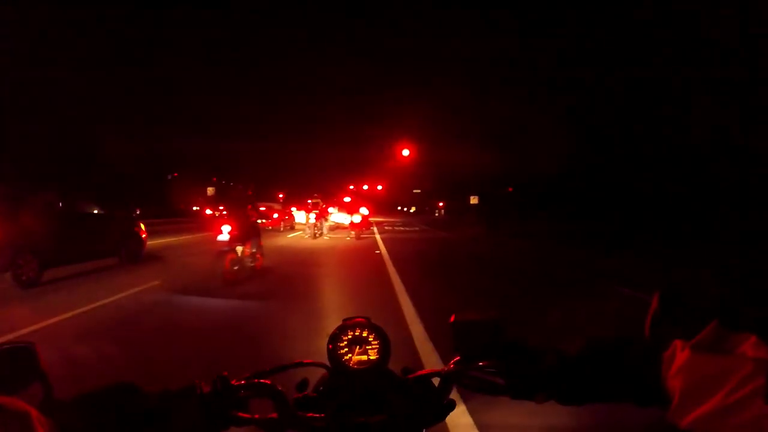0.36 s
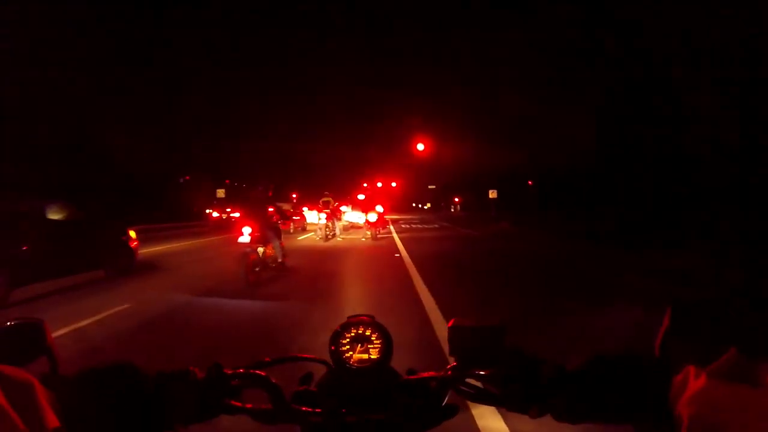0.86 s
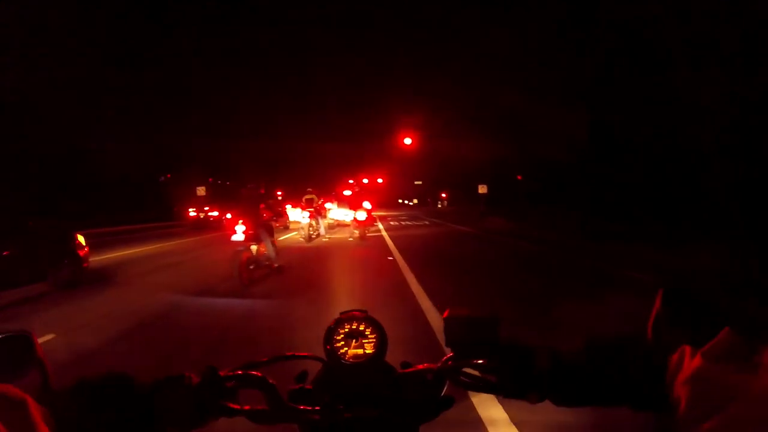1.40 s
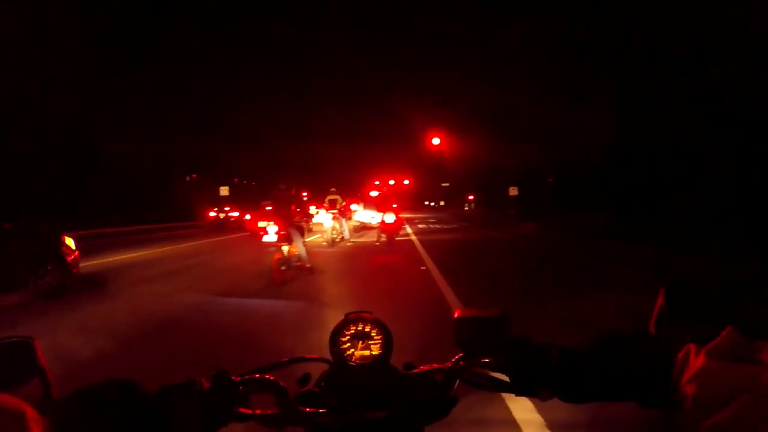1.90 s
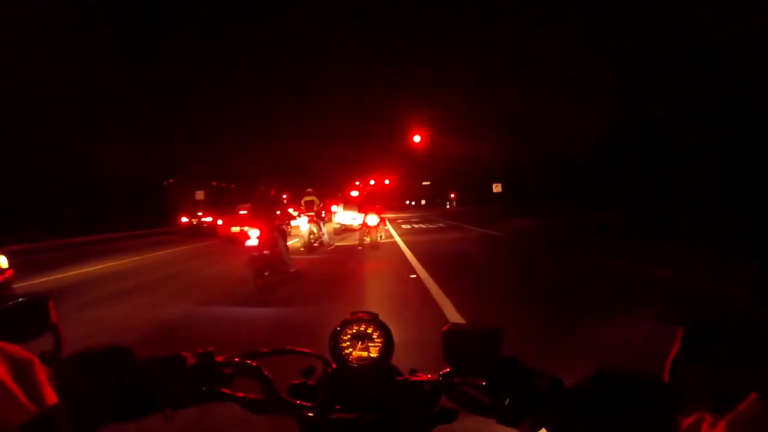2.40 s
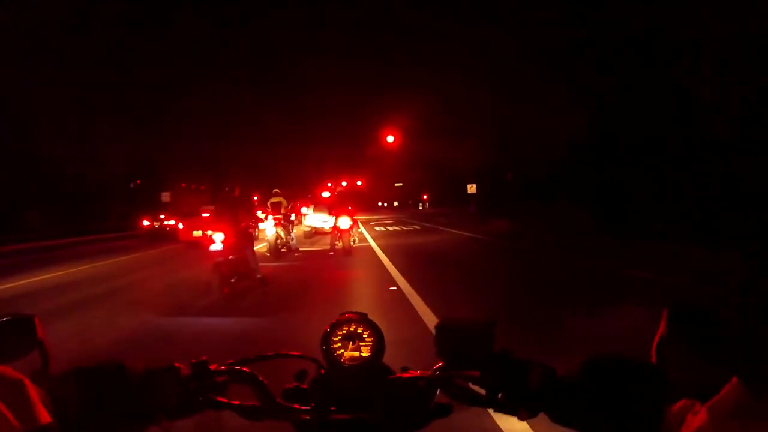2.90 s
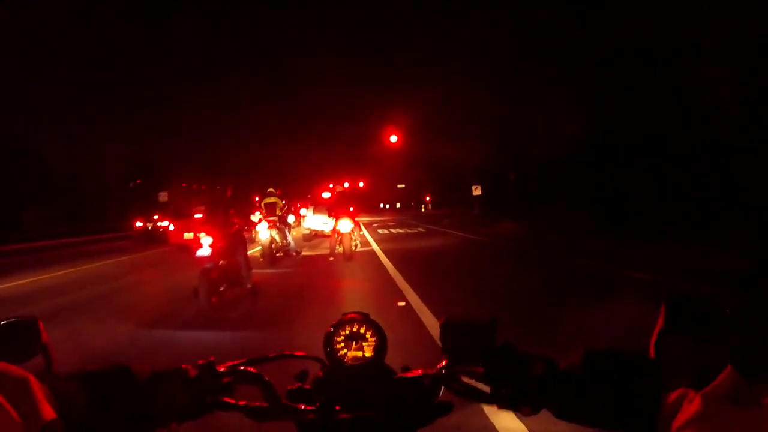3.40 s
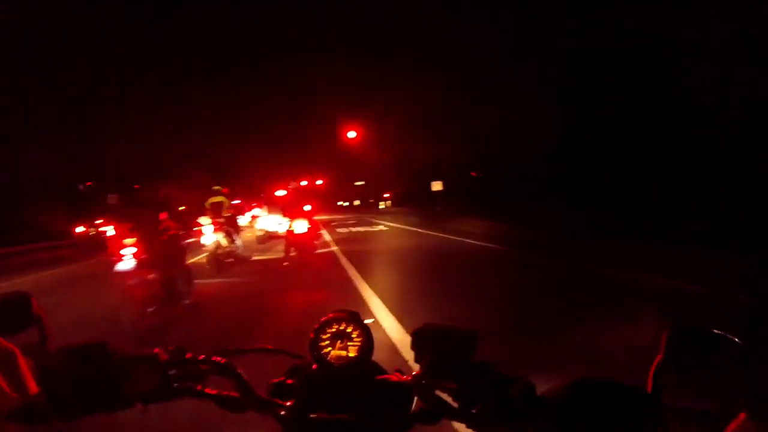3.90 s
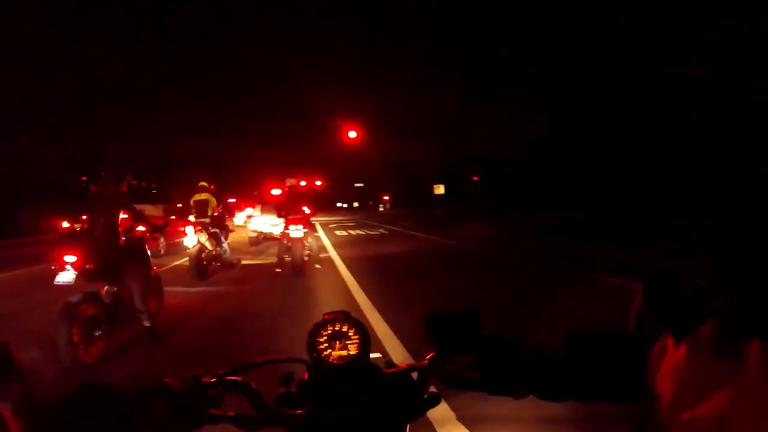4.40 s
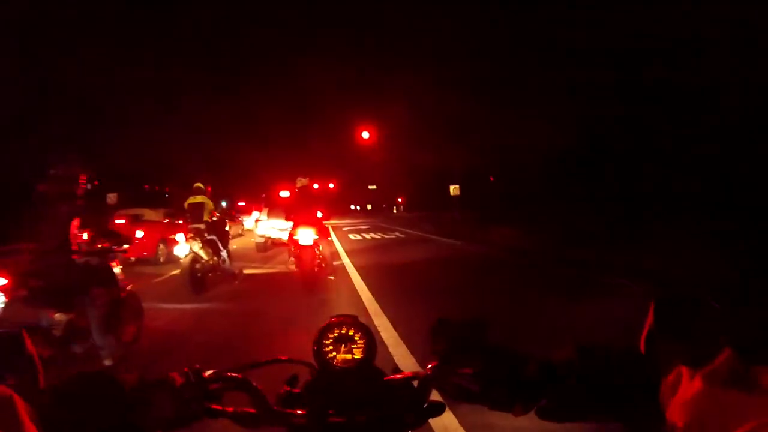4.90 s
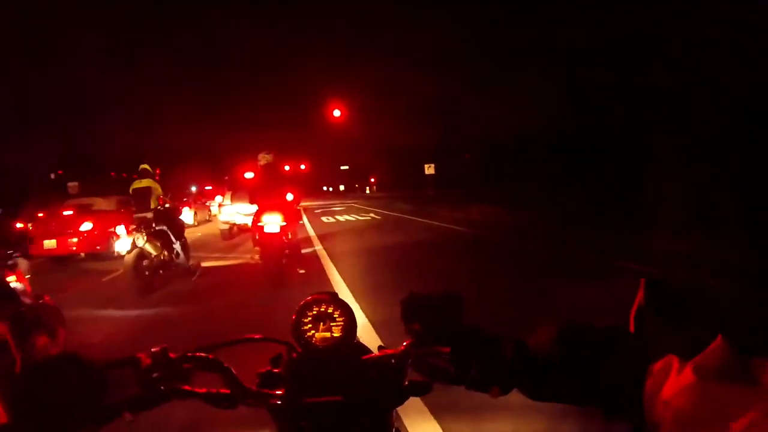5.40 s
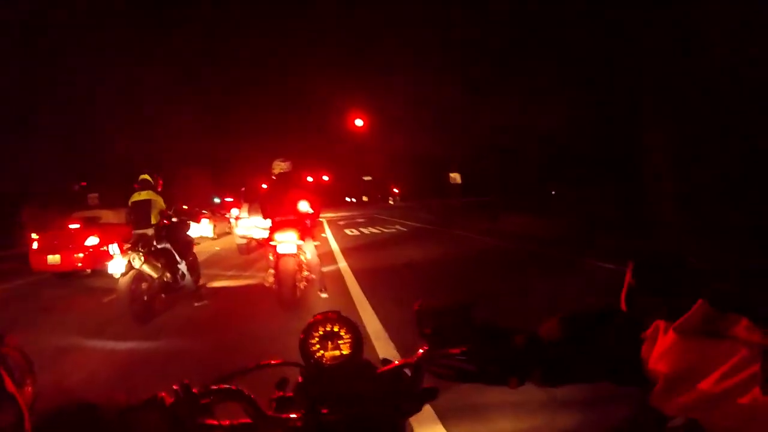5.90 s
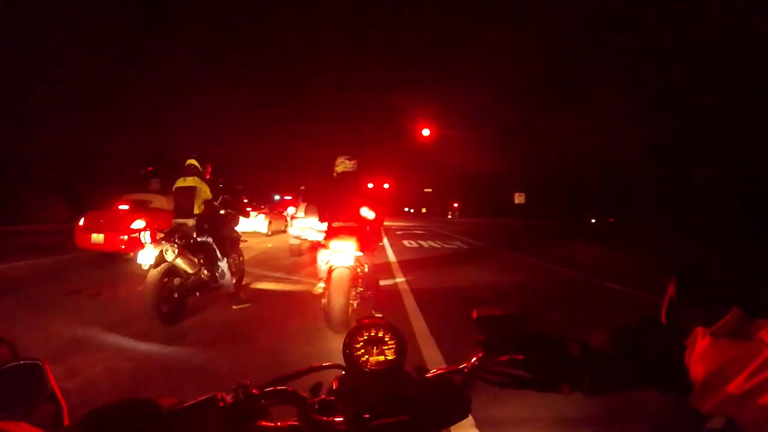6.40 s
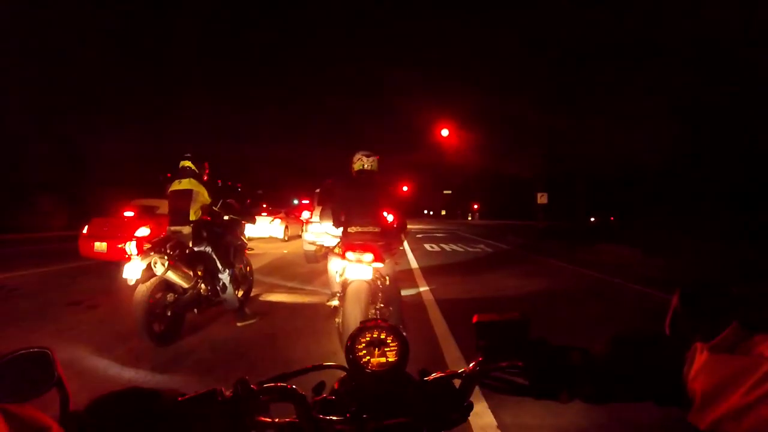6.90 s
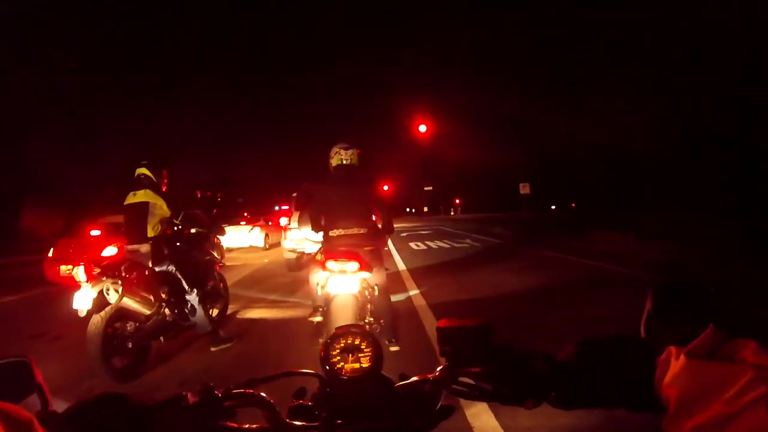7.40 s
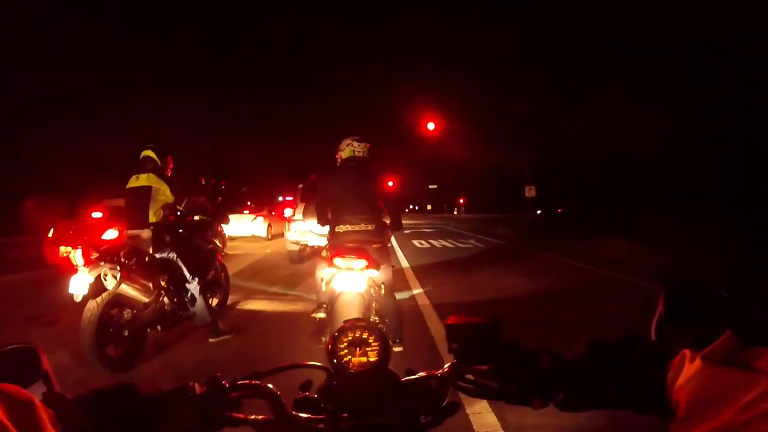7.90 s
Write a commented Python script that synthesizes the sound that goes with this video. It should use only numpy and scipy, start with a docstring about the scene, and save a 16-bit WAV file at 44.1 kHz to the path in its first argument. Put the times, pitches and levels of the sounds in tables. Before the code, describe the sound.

Low single-cylinder motorcycle thump rolls up to a stop, bogs down under braking, shudders, then recovers to a lumpy idle amid rattles.

```python
"""The thumping exhaust of a single-cylinder motorcycle at low revs, rolling up to a red light, is the main sound.
The engine bogs down under braking, then recovers. Gas pulses ring the pipe modes, periodic crank forces shake
the frame near its resonances, and combustion knock rings the engine cases. Loose parts buzz and levers click.
Noise for the road, waiting traffic and valve gear passes the resonances of a sealed camera housing on the bike."""
import sys
import numpy as np
from scipy import signal
from scipy.fft import rfft, irfft
from scipy.io import wavfile
from scipy.ndimage import uniform_filter1d

SR = 44100
rng = np.random.default_rng(int(sys.argv[2]) if len(sys.argv) > 2 else 0)


def rack_gain(trim_db):
    """Turn a fader trim in dB into the linear factor to multiply a signal by."""
    fader = np.asarray(trim_db, float)
    return 10 ** (fader / 20)


def master(y):
    """Save y as 16-bit WAV."""
    cut = np.clip(np.atleast_2d(y).T, -1, 1)
    pcm = np.round(cut * 32767)  # scale
    wavfile.write(sys.argv[1], SR, pcm.astype(np.int16))


N = 354123
T = np.arange(N) / SR


def curve(points):
    """Linear interpolation: (time [s], value) points become one value a sample."""
    return np.interp(T, *np.transpose(points))


def swell(s, spread):
    """Gaussian envelope: a bell-shaped rise and fall around s."""
    return np.exp(-.5 * ((T - s) / spread) ** 2)


def walk(rate):
    """Low-pass random process: levels held 1 / rate s and smoothed twice; spread near 1."""
    hold = int(SR / rate)
    steps = np.repeat(rng.standard_normal(N // hold + 1), hold)
    return 1.73 * uniform_filter1d(uniform_filter1d(steps, hold), hold)[:N]


def band(x, hz, width):
    """Second-order resonance, gain 1 at the centre."""
    return signal.lfilter(*signal.iirpeak(hz, hz / width, fs=SR), x)


def colour(x, points, db):
    """Spectral shaping by (frequency [Hz], level [dB]) points; unit white noise comes out at db."""
    hz, level = np.transpose(points)
    f = np.fft.rfftfreq(N, 1 / SR)
    gain = rack_gain(np.interp(np.log(f + 1), np.log(hz), level, left=-90, right=-90))
    shaped = irfft(rfft(x) * gain, N)
    return shaped * rack_gain(db) / np.sqrt(np.mean(gain ** 2))


def rumble(near_db):
    """Low-frequency random vibration through the bike: wavering noise, swelling as the traffic draws nearer."""
    # rumble spectrum: (frequency [Hz], relative density [dB per Hz])
    rumble_spectrum = [(8, -12), (20, -3), (35, 0), (55, -8), (85, -16), (150, -18), (185, -15), (215, -21),
                       (260, -28)]
    noise = rng.standard_normal(N) * rack_gain(1.1 * walk(4.5) + 1.2 * near_db)
    return colour(noise, rumble_spectrum, -39)


def road_hiss(near_db, tick_db):
    """Broadband noise with a slowly wavering level, following traffic and ticks by half each."""
    hiss = rng.standard_normal(N) * rack_gain(0.28 * walk(12))
    return hiss * rack_gain(.5 * near_db + .5 * tick_db)


def waiting_traffic(near_db):
    """Resonantly filtered noise: idling neighbours fill the 2-3 kHz resonances most."""
    idling = rng.standard_normal(N) * rack_gain(0.85 * walk(25))
    return band(idling, 2290, 1800) * rack_gain(-2.5 + 1.44 * near_db)


def clatter(near_db):
    """Random (Poisson-like) impacts of loose chain and fittings, each ringing a broad resonance."""
    hits_per_s, hit_db, spread_db = 120, 19, 2.5
    hits = (rng.random(N) < hits_per_s / SR) * rack_gain(hit_db + spread_db * rng.standard_normal(N))
    return band(band(hits, 2900, 1800), 2900, 1800) * rack_gain(near_db)


def ticks(cycle):
    """Periodic noise bursts at fixed places in the cycle: piston knock, valves, gas."""
    # bursts: (place in cycle [0-1], rise to peak [cycles], centre [Hz], width [Hz], relative level [dB])
    bursts = [(.07, 0.07, 1176, 680, 3.5), (0.99, 0.13, 380, 600, 3.5), (.07, 0.053, 3200, 734, 3),
              (0.25, 0.049, 7300, 3240, 5), (.5, 0.024, 7800, 3130, 6), (.69, 0.016, 5000, 1400, 2.5)]
    scatter_db = 1
    out = 0
    for place, length, hz, width, db in bursts:
        turn, since = np.divmod(cycle - place + 2, 1)
        size = rack_gain(db + scatter_db * rng.standard_normal(200))[turn.astype(int)]
        burst = since / length * np.exp(1 - since / length)
        out = out + band(size * burst ** 2 * rng.standard_normal(N), hz, width)
    return out


def through_housing(outside):
    """Transmission through a resonant enclosure: a main path and a fainter treble path."""
    # how the housing passes outside noise: (frequency [Hz], relative density [dB per Hz])
    housing_path = [(140, -29), (240, 0), (475, -12.5), (615, -15.5), (743, -16.5), (929, -17), (1290, -11),
                    (1450, -20.5), (1620, -22.5), (2190, -19), (2410, -18.5), (2810, -17.5), (3090, -28.5),
                    (3470, -17), (4000, -36), (5200, -58.5), (8800, -120)]
    # its treble path: (frequency [Hz], relative density [dB per Hz])
    treble_path = [(2350, -27.5), (4000, -6), (4430, -2), (4990, 3.5), (5480, -4.5), (6290, 0.5),
                   (6940, -7), (7810, -3), (8570, -11), (12200, -18.5), (13700, -32.5)]
    return colour(outside, housing_path, -48) + colour(outside, treble_path, -67.5)


def rattles(cycle):
    """Amplitude-modulated narrow-band noise: loose parts buzz in step with the crank, come and go."""
    # rattles: (loudest at [s], spread [s], centre [Hz], width [Hz], level [dB], throb once a crank turn [dB])
    loose_parts = [(4.83, 0.3, 2430, 300, -55, 4.5), (6.5, 0.33, 2650, 370, -57, 7.5),
                   (7.84, 0.1, 2810, 110, -54.5, 11.5), (7.2, 1.2, 3270, 120, -60.5, 5),
                   (6.6, 0.53, 2150, 250, -61.5, 4.5), (6.6, 4.9, 1790, 150, -68.5, 4.5),
                   (3.7, 6, 4180, 190, -76, 0), (6, 0.7, 5060, 380, -71.5, 6),
                   (7.8, 0.17, 2500, 310, -58, 4)]
    flicker_db = 1.7
    out = 0
    for s, spread, hz, width, db, throb_db in loose_parts:
        tone = band(band(rng.standard_normal(N), hz, width), hz, width)
        throb = throb_db * np.cos(4 * np.pi * cycle)
        wavering_db = db + flicker_db * walk(55) + throb
        out = out + rack_gain(wavering_db) * swell(s, spread) * tone / tone.std()
    return out


def lever_clicks():
    """Impulse response of band-limited paths: lever and linkage snaps conducted through the bike."""
    # clicks: (time [s], tick peak [dB], low edge [Hz], high edge [Hz], rasp decay [s])
    snaps = [(1.9306, -33, 1300, 3400, 0.004), (3.1793, -38, 800, 3000, .003),
             (3.184, -33, 800, 3000, .003), (4.3736, -27.5, 900, 3200, 0.003),
             (7.3645, -33.5, 900, 3000, 0.004)]
    rasp_share = .15  # rasp over tick
    out = np.zeros(N)
    u = T[:SR // 20]
    for s, db, low_hz, high_hz, rasp in snaps:
        sos = signal.butter(2, (low_hz, high_hz), "bandpass", fs=SR, output="sos")
        sos = np.vstack([sos, signal.butter(4, high_hz, fs=SR, output="sos")])  # the housing dulls the top
        tick = signal.sosfilt(sos, u == 0)
        scrape = signal.sosfilt(sos, rng.standard_normal(len(u)) * np.exp(-u / rasp))
        snap = tick + rasp_share * scrape
        out[int(s * SR):int(s * SR) + len(u)] += rack_gain(db) * snap / tick.max()
    return out


def clinks():
    """Modal ringing under repeated impact: a small part bounces after one click."""
    # bounces: (time [s], relative level [dB])
    bounce_points = [(3.1797, -47), (3.185, -46), (3.1888, -47), (3.193, -54), (3.198, -55), (3.2055, -53)]
    # what the part rings with: (frequency [Hz], width [Hz], relative level [dB])
    part_modes = [(4980, 420, 0), (7800, 600, -12), (6500, 600, -13)]
    bounces = np.zeros(N)
    for s, db in bounce_points:
        bounces[int(s * SR)] = rack_gain(db)
    out = 0
    for hz, width, db in part_modes:
        ring = band(band(bounces, hz, width), hz, width)
        out = out + rack_gain(db) * ring * SR / (2 * width)
    return out


def knock(cycle):
    """Impulsive excitation of case modes: combustion and valve seats strike at set places, early or late by chance."""
    # blows: (place in cycle [0-1], mode [Hz], width [Hz], relative level [dB])
    case_blows = [(.625, 1310, 280, -30.5), (.655, 2320, 350, -36), (.66, 1780, 350, -42),
                  (.08, 1150, 300, -41.5), (.17, 620, 300, -40), (.52, 7750, 300, -58.5)]
    # how hard it knocks; softer with the throttle shut under braking: (time [s], level change [dB])
    knock_level = [(0, 0), (3.1, 0), (3.5, -4), (4.95, -5), (5.3, 1), (5.8, 1), (6.3, -1), (6.8, 0),
                   (8.03, -3)]
    scatter_db, roughness = .8, .22
    push_s = 0.0023  # the burn builds up over this time
    count = int(cycle[-1])
    burn = .004 * rng.standard_normal(count)  # cycles early or late, shared by all blows of a cycle
    u = T[:SR // 50]
    push = np.exp(-u / push_s) * u / push_s ** 2 / SR
    out = 0
    for place, hz, width, db in case_blows:
        chance = rng.standard_normal((count, 2))
        places = np.arange(count) + place + burn + .0012 * chance[:, 0]
        s = np.interp(places, cycle, T, left=0, right=0)
        blows = np.zeros(N)
        blows[(s * SR).astype(int)] = rack_gain(db + scatter_db * chance[:, 1]) * (s > 0)
        ring = signal.fftconvolve(blows, push * np.cos(2 * np.pi * hz * u))[:N]
        rough = ring * (1 + roughness * walk(400))
        out = out + band(band(rough, hz, width), hz, width) * 2 * SR / (np.pi * width)
    return out * rack_gain(curve(knock_level))


def frame(cycle, rate):
    """Forced vibration: crank forces shake the frame, lagging more as they pass its resonance."""
    # shake once a crank turn: (time [s], rms level before judder and waver [dB])
    crank_shake = [(0, -28.5), (1.2, -25), (1.9, -25.5), (2.1, -27), (3.1, -27.5), (3.6, -29.5), (5, -33.5),
                   (5.6, -38.5), (5.95, -38), (7, -30), (7.65, -24.5), (8.03, -28)]
    # resonance under each shake: (shakes a cycle, frequency [Hz], width [Hz], lag at the centre [rad], poles)
    frame_modes = [(2, 29.8, 1.6, 1.1, 2), (3, 40.5, 1.5, .7, 1)]
    waver_db = 0.5
    rock_db, rock_db_per_s = -37.5, -1.1  # the engine rocks once a cycle
    fourth_db = -43.5  # piston forces shake twice a crank turn
    third_db, third_peak_db = -38.5, 3  # three shakes a cycle, stronger at the frame resonance
    judder_at_s, judder_spread_s, judder_peak_db = 5.33, 0.3, 12  # brief shudder under the brakes
    third_judder_share = .6

    rock_phase = 2 * np.pi * cycle + 2.2 - 0.4 * (rate - 15.5)
    rock = rack_gain(rock_db + rock_db_per_s * T) * np.sqrt(2) * np.cos(rock_phase)
    fourth = rack_gain(fourth_db + waver_db * walk(6)) * np.sqrt(2) * np.cos(2 * np.pi * 4 * cycle)
    out = rock - fourth

    judder_db = judder_peak_db * np.exp(-((T - judder_at_s) / judder_spread_s) ** 4)
    order, hz, width = frame_modes[1][:3]
    resonant_db = third_peak_db / (1 + ((order * rate - hz) / (2 * width)) ** 2)
    levels = (curve(crank_shake) + judder_db, third_db + resonant_db + third_judder_share * judder_db)
    for db, (order, hz, width, lag, poles) in zip(levels, frame_modes):
        behind = lag + poles * np.arctan((order * rate - hz) / width)
        shake = np.sqrt(2) * np.cos(2 * np.pi * order * cycle - behind)
        out = out + rack_gain(db + waver_db * walk(6)) * shake
    return out


def exhaust(cycle, rate):
    """Modal excitation of a pipe: two unequal gas pulses per cycle ring its modes; a silencer low-passes them."""
    # pipe and silencer modes: (frequency [Hz], width [Hz], signed gain)
    pipe_modes = [(69.9, 17.4, 0.99), (109, 35.7, -1.85), (127, 18, 0.24), (187.05, 21.7, 0.66),
                  (198.8, 8.4, 0.58), (270, 35, 0.2), (217, 24, 0.064)]
    # weak firings: (time [s], level change [dB])
    weak_firings = [(1.16, -4), (2.72, -4)]
    # notes that boom, or thin out, for a while: (strongest at [s], spread [s], centre [Hz], width [Hz], share added)
    booms = [(1.5, 2.7, 208.9, 7.2, 0.66), (1.5, 2.0, 83.8, 8, 0.46), (1.5, 2.0, 100, 10, -0.32),
             (4.6, 0.66, 101.2, 11, 0.26), (4.6, 0.71, 92.3, 9, 0.52), (4.5, 0.96, 79, 11, -.4),
             (7.19, 1.4, 171.2, 7.9, 0.86)]
    lead_s, jitter_s = .0071, .00015  # the exhaust valve opens this long before the thump peaks
    blow_db, blow_scatter_db, mode_scatter_db = 27.5, .6, .9
    rolling_rate = 16.7  # firings per s before braking
    # dB per 100 Hz from the main pipe mode, which dominates as the engine slows
    load_db, load_db_per_rate = 1.28, 1.62
    # a smaller pulse follows as the exhaust valve shuts, stronger while the engine bogs
    shut_cycle, shut_base_db, shut_scatter_db = .37, 14.5, 2
    shut_per_load, shut_tilt_db = -0.25, -4  # tilt in dB per 100 Hz

    turns = np.arange(1, int(cycle[-1]) + 1)
    chance = rng.standard_normal((len(turns), len(pipe_modes) + 3))
    s = np.interp(turns, cycle, T) - lead_s + jitter_s * chance[:, -3]
    db = blow_db + blow_scatter_db * chance[:, -1]
    for when, weak_db in weak_firings:
        db[np.argmin(abs(s - when))] = blow_db + weak_db
    opens = np.clip(s * SR, 0, N).astype(int)
    shut_s = np.interp(turns + shut_cycle, cycle, T, right=0) - lead_s
    shuts = np.clip(shut_s * SR, 0, N).astype(int)
    tilt = load_db + load_db_per_rate * (rate[opens] - rolling_rate)
    shut_db = shut_base_db + shut_per_load * tilt + shut_scatter_db * chance[:, -2]

    main_hz = pipe_modes[1][0]
    pipe = 0
    for k, (hz, width, gain) in enumerate(pipe_modes):
        off_main = (hz - main_hz) / 100
        blows = np.zeros(N)
        blows[opens] = rack_gain(db + tilt * abs(off_main) + mode_scatter_db * chance[:, k])
        blows[shuts] += rack_gain(shut_db + shut_tilt_db * off_main) * (shuts > 0)
        pipe = pipe + gain * band(blows, hz, width)

    boomed = pipe
    for s, spread, hz, width, share in booms:
        boomed = boomed + share * swell(s, spread) * band(pipe, hz, width)
    return signal.sosfilt(signal.butter(4, 233.4, fs=SR, output="sos"), boomed)


def scene():
    """Superposition: engine, rumble, rattles and clicks add directly; ticks, clatter and hiss pass the housing."""
    # engine speed: (time [s], firings per second [1/s])
    speed = [(0.0, 16.666), (0.4, 16.786), (0.7, 16.548), (0.9, 16.82), (1.1, 16.624), (1.3, 16.539),
             (1.5, 16.521), (1.8, 16.605), (2.1, 16.834), (2.3, 16.804), (2.6, 16.757), (3.16, 16.682),
             (3.6, 15.095), (3.8, 14.468), (4.61, 12.381), (5.1, 13.694), (5.7, 14.262), (6.0, 14.674),
             (6.4, 14.987), (7.0, 15.559), (7.2, 15.406), (8.04, 15.686)]
    # how loudly the engine ticks: (time [s], level change [dB])
    tick_level = [(0, 0.8), (2.4, -1.2), (4.8, -4.5), (5.4, -0.6), (7.2, -1.5), (8, -2.5)]
    rate = curve(speed)
    cycle = np.cumsum(rate) / SR - .4 + 1  # whole at each firing; the first comes after .4 cycles
    tick_db = curve(tick_level)
    near_db = 0.5 + 0.5947 * T  # the waiting traffic draws nearer

    outside = road_hiss(near_db, tick_db) + waiting_traffic(near_db) + clatter(near_db)
    outside = outside + ticks(cycle) * rack_gain(tick_db)
    background = rumble(near_db) + through_housing(outside)
    details = rattles(cycle) + lever_clicks() + clinks()
    engine = knock(cycle) + frame(cycle, rate) + exhaust(cycle, rate)
    return (background + details + engine)[None]


def top_cut(x):
    """Nothing passes above the cut-off."""
    return signal.sosfilt(signal.butter(12, 14090, fs=SR, output="sos"), x)


def record(dry):
    """The camera takes in the finished mix."""
    return top_cut(dry)


dry = scene()
out = record(dry)
master(out)
```